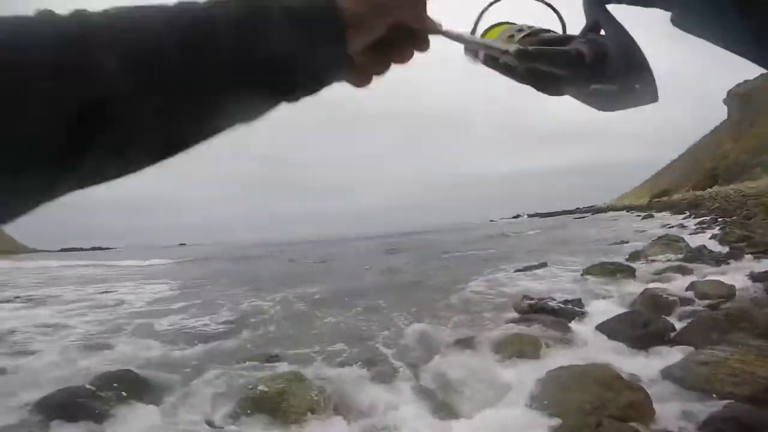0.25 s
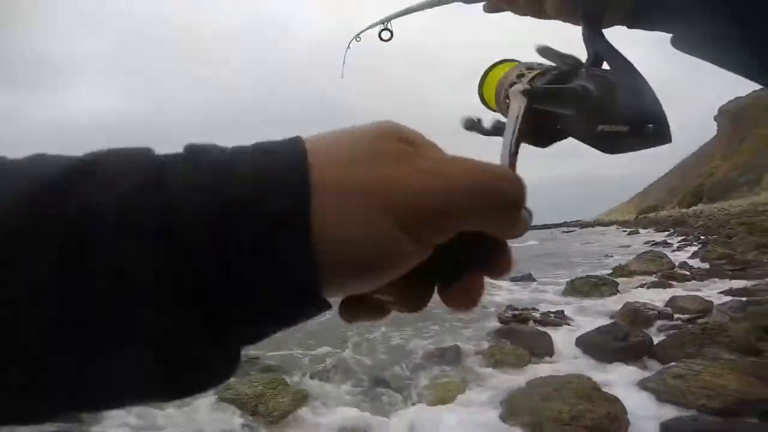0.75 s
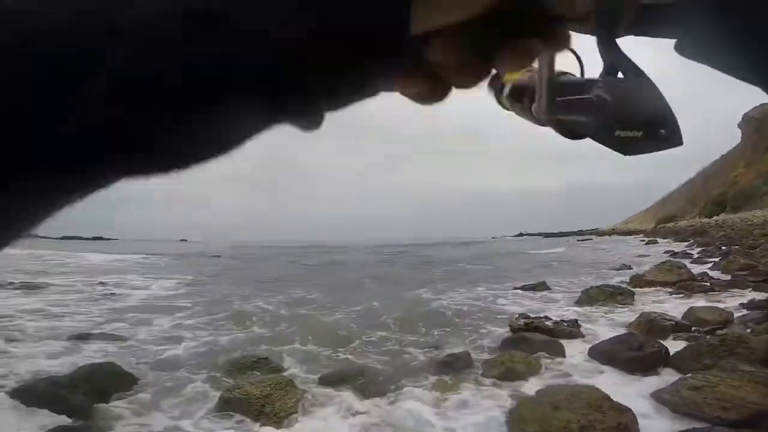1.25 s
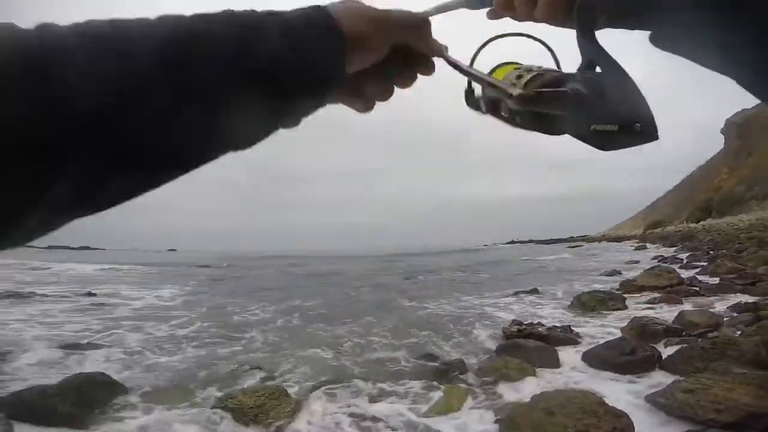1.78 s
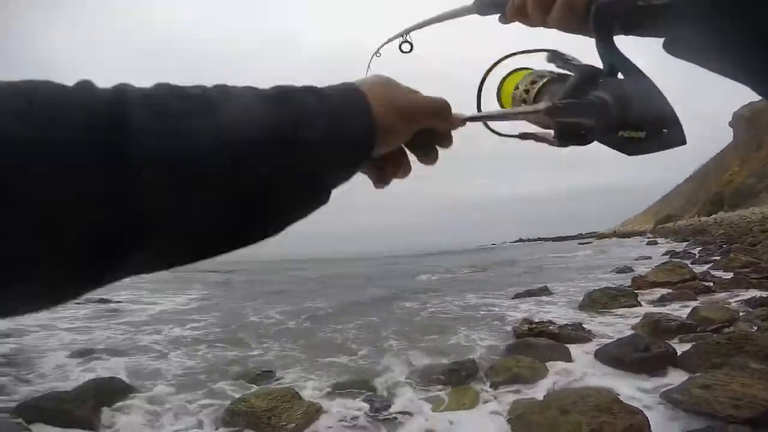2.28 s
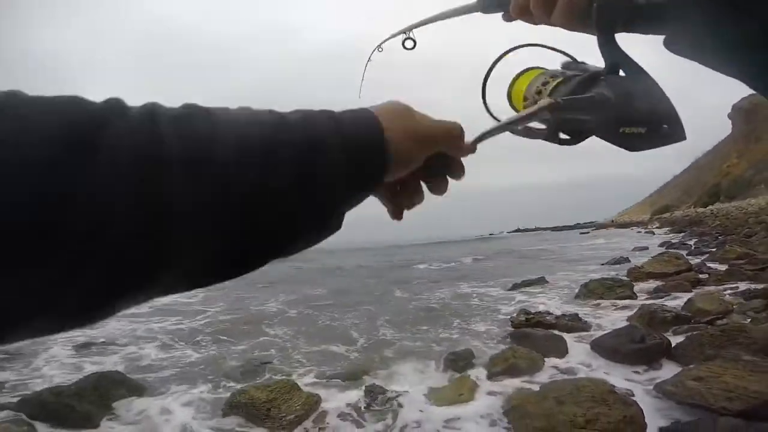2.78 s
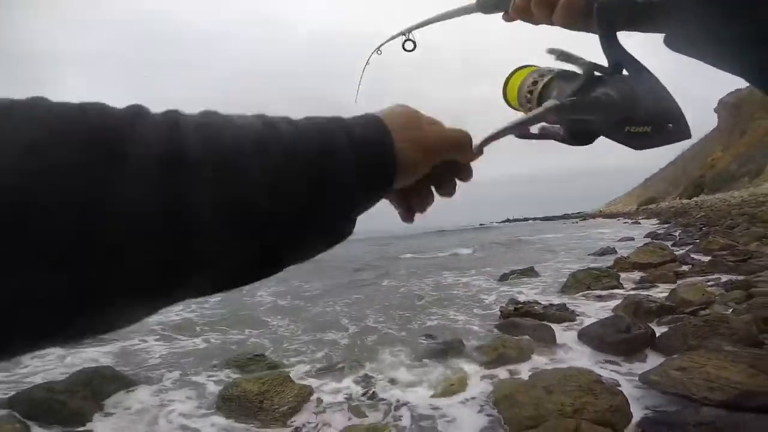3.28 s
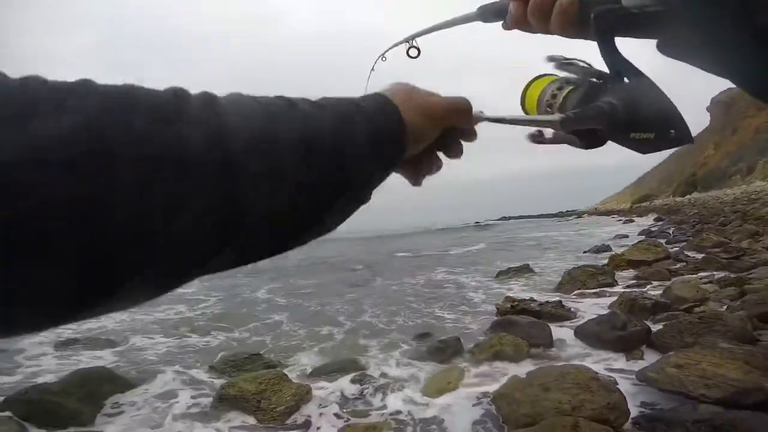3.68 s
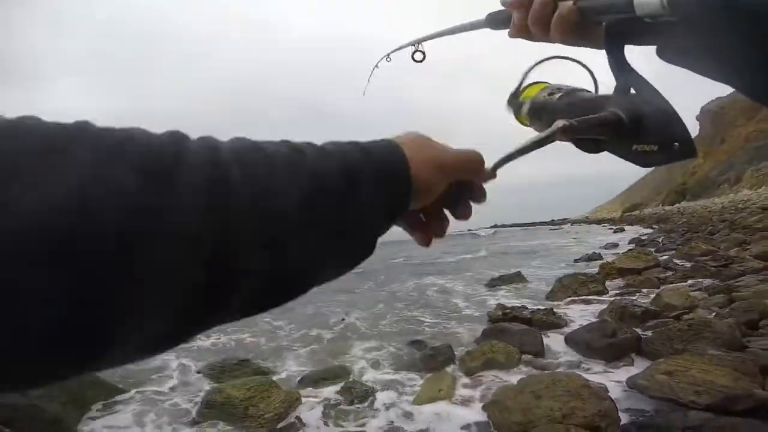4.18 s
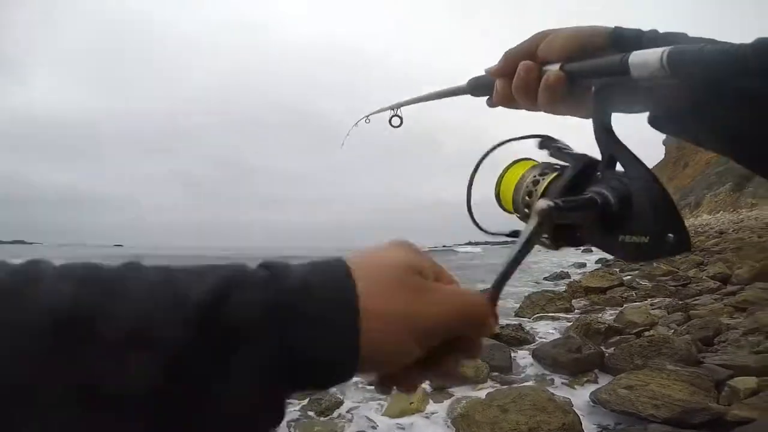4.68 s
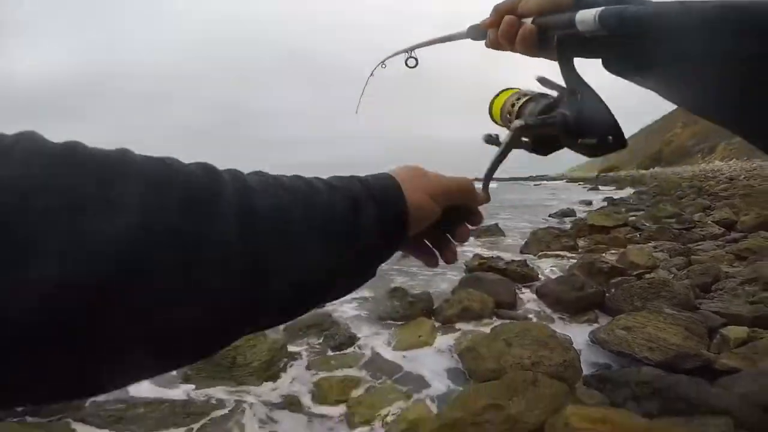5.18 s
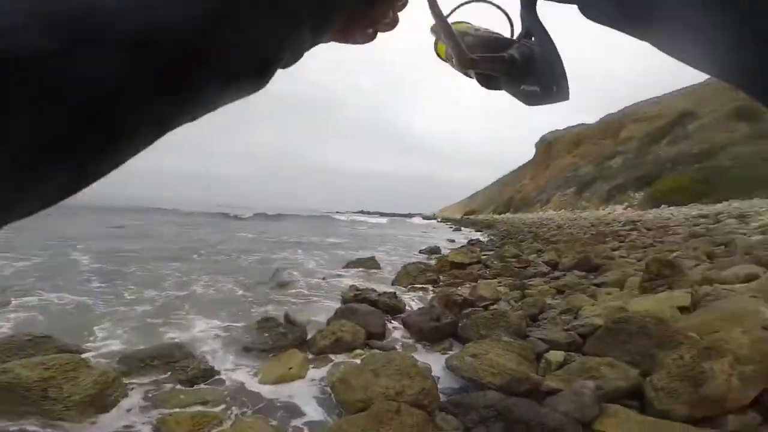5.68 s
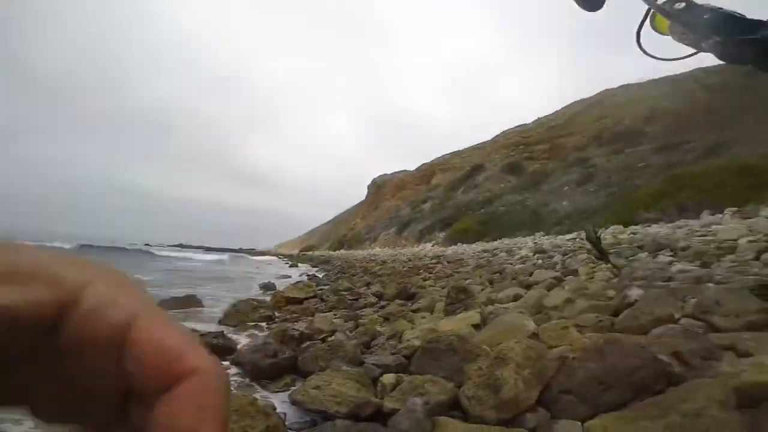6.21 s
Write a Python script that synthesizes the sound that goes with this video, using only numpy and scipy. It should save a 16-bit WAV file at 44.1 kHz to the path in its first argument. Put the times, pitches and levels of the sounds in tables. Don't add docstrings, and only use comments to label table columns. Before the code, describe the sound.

Heard from inside a closed camera housing at a rocky shore: a bright wave hisses and splashes away during the first second, leaving a quieter steady surf. Low wind buffets press on the case. Turning a fishing reel sends irregular dull thumps through the mount, with faint gear whirr and tiny line ticks. At the end the surf swells again and a hand strikes and rubs the housing very loudly.

```python
import sys
import numpy as np
from scipy import signal
from scipy.fft import rfft, irfft
from scipy.io import wavfile
from scipy.ndimage import uniform_filter1d

SR = 44100
rng = np.random.default_rng(int(sys.argv[2]) if len(sys.argv) > 2 else 0)


def output_pcm(signal):
    pcm = np.clip(np.atleast_2d(signal).T, -1, 1) * 32767
    wavfile.write(sys.argv[1], SR, np.round(pcm).astype(np.int16))


def how_loud(loudness_db):
    steps = np.asarray(loudness_db, float) / 20
    return 10 ** steps


N = 284437


def evened(x):
    return x / np.sqrt(np.mean(x ** 2) + 1e-20)


def read(points, hz):
    f, value = np.transpose(points)
    return np.interp(np.log(hz + 1), np.log(f + 1), value)


def curves(rows, t):
    s, *columns = np.transpose(rows)
    return [np.interp(t, s, c) for c in columns]


def add(mix, s, sound):
    part = mix[round(s * SR):][:len(sound)]
    part += sound[:len(part)]


def shaped(gain_of_hz):
    hz = np.fft.rfftfreq(N, 1 / SR)
    return evened(irfft(rfft(rng.standard_normal(N)) * gain_of_hz(hz), N))


def coloured(points):
    return shaped(lambda hz: how_loud(read(points, hz)))


def wander(ms):
    span = max(int(ms * SR / 1000), 1)
    return evened(uniform_filter1d(uniform_filter1d(rng.standard_normal(N), span), span))


def steadied(x, ms):
    envelope = uniform_filter1d(abs(signal.hilbert(x)), int(ms * SR / 1000))
    return evened(x / (envelope + 0.36))


def bells(rows, base_db):
    t = np.arange(0, N, 64) / SR
    power = sum(how_loud(db) ** 2 * np.exp(-(2 * (t - s) / length) ** 2) for s, db, length in rows)
    return 10 * np.log10(how_loud(base_db) ** 2 + np.interp(np.arange(N) / SR, t, power))


# (centre [Hz], width [Hz], level [dB])
HOUSING_MODES = [(1274, 190, 6.5), (1756, 47, -5), (2200, 194, 4), (2755, 120, 5), (3140, 100, 5.5),
                 (3554, 190, 6), (3960, 97, 6), (4580, 79, -1), (5060, 830, 7), (6100, 180, -2),
                 (6250, 310, 5.5), (7500, 2700, 6.5), (8600, 1200, -5), (12030, 420, -6.5)]


def housing_db(hz):
    return sum(db / (1 + (2 * (hz - f) / width) ** 2) for f, width, db in HOUSING_MODES)


# (time [s], level [dB])
DRAINING = [(0.0, -32), (0.07, -33.5), (0.23, -35), (.45, -37.5), (0.6, -39), (0.78, -40.5), (0.96, -45.5),
            (1.43, -50), (2.87, -49), (3.4, -50.5), (6.45, -50)]


def tide(t):
    drain_db = curves(DRAINING, t)[0]
    from_db, full_db = -53, -36
    near = np.clip((drain_db - from_db) / (full_db - from_db), 0, 1)
    body_db = drain_db + 1.27 * np.maximum(t - 2.92, 0)
    fizz_db = drain_db - 8.5 + 1.3 * near ** 3 - 0.64 * np.sin(np.pi * near)
    surge_s, rise_s = 6.23, 0.29
    surge = np.exp(-(np.maximum(surge_s - t, 0) / rise_s) ** 2)
    rumble_db = 0.3 * near + 3 * surge
    splash_db = 6.5 * surge
    return body_db, fizz_db, rumble_db, splash_db, near


# (frequency [Hz], level [dB per Hz])
NEAR_TONE = [(88, -45), (150, -5.5), (234, -10), (409, -5), (803, -7), (1250, -12), (1600, -9),
             (2400, -5.5), (3500, -12), (4200, -16), (7370, -17), (8600, -18.5), (15000, -26.5)]
# (frequency [Hz], level [dB per Hz])
FAR_TONE = [(90, -31), (150, -6), (250, -5.5), (600, -5), (1050, -10), (1280, -3), (1550, -6.5),
            (2500, -8.5), (4200, -16.5), (5500, -18.5), (7500, -21), (9000, -21), (15000, -26.5)]


def surf(patchy_db=1.25, flicker_db=0.14):
    hop, window = 128, 512
    frames = N // hop + 5
    hz = np.fft.rfftfreq(window, 1 / SR)[:, None]
    a, b, patches = rng.standard_normal((frames, len(hz), 3)).T
    patches = evened(uniform_filter1d(uniform_filter1d(patches, 6, 0), 14, 1))
    flicker = evened(uniform_filter1d(rng.standard_normal(frames), 7))
    body_db, fizz_db, rumble_db, splash_db, near = tide(np.arange(frames) * hop / SR)

    shape = how_loud((1 - near) * read(FAR_TONE, hz) + near * read(NEAR_TONE, hz))
    shape *= how_loud(rumble_db * np.clip(np.log2(1300 / (hz + 1)), 0, 1))
    shape *= how_loud(splash_db * np.exp(-(np.log2((hz + 1) / 2000) / 0.3) ** 2))
    heard = shape * how_loud(housing_db(hz))
    body_sum = np.sqrt(((heard * ((hz > 300) & (hz < 4000))) ** 2).sum(0))
    fizz_sum = np.sqrt(((heard * (hz >= 4000)) ** 2).sum(0))
    high = np.clip(np.log2((hz + 1) / 3000), 0, 1)
    shape *= (how_loud(body_db) / body_sum) ** (1 - high) * (how_loud(fizz_db) / fizz_sum) ** high

    chance = how_loud(patchy_db * patches + flicker_db * flicker * (0.3 + high))
    foam = (a + 1j * b) * shape * chance
    outside = signal.istft(foam, nperseg=window, noverlap=window - hop)[1][:N]
    return irfft(rfft(outside) * how_loud(housing_db(np.fft.rfftfreq(N, 1 / SR))), N)


def bubbles(under_surf_db=-10.5, per_s=900, spread_db=2.6):
    size = how_loud(spread_db * np.minimum(rng.exponential(1, N), 5))
    pops = size * (rng.random(N) < per_s / SR)
    kind = rng.integers(0, 24, N)
    out = np.zeros(N)
    for k, hz in enumerate(np.geomspace(900, 9000, 24)):
        u = np.linspace(0, 1, int(5 * SR / hz))
        grain = np.sin(2 * np.pi * 5 * (u + 0.11 * u ** 2)) * np.sin(np.pi * u ** 1.43) ** 2
        level = how_loud(read(NEAR_TONE, hz) + housing_db(hz))
        out += level * signal.oaconvolve(pops * (kind == k), grain)[:N]
    body_db = tide(np.arange(N) / SR)[0]
    return how_loud(under_surf_db + body_db) * evened(out)


# (time [s], peak level [dB], pitch [Hz], direction [+-1], rebound [share])
MOUNT_JOLTS = [(0.3998, -12, 79.5, -1, 0.54), (.813, -21, 79, 1, 0.11), (0.836, -22.5, 34.7, 1, -0.11),
               (0.961, -33, 70, 1, 0.18), (1.972, -22.5, 73.4, -1, 0.44), (2.402, -32, 89, 1, -0.23),
               (2.841, -24, 72, -1, 0.017), (3.333, -22.5, 83, -1, 0.28), (3.774, -16.5, 82, -1, 0.41),
               (4.601, -36, 83, -1, .2), (1.181, -38, 90, 1, 0.0035), (3.504, -36, 99, 1, 0.72),
               (4.78, -39.5, 137, 1, 0.06), (5.211, -42, 132, 1, 0.36), (5.959, -46, 108, 1, -0.039),
               (6.05, -40, 131, -1, 0.32), (5.01, -31, 154, -1, 0.56), (5.352, -16, 81, 1, 0.16),
               (6.377, 1.6, 59, -1, 0.025), (6.388, -11, 58.4, 1, .05), (6.37, -18, 75, -1, -0.062),
               (6.403, -17, 80, -1, -1), (6.427, -18.5, 187, 1, -1.1), (6.453, -5, 43, -1, -0.14)]


def jolts(sharp=1.73, narrow=1.71, sag=0.59):
    out, t = np.zeros(N), np.arange(N) / SR
    for s, db, hz, way, share in MOUNT_JOLTS:
        near = slice(round((s - .05) * SR), round((s + .07) * SR))
        turn = hz * (t[near] - s)
        phase = turn / (1 + sag * np.maximum(turn, 0))
        steepness = np.where(turn < 0, sharp, narrow)
        swing = np.cos(2 * np.pi * phase) * np.exp(-(steepness * turn) ** 4 / (1 + turn ** 2))
        rebound_turn = 0.94 + 0.25 * share
        rebound = share * np.exp(-(3 * (turn - rebound_turn)) ** 2)
        out[near] += how_loud(db) * np.sign(way) * (swing - rebound)
    return out


# (time [s], peak level [dB])
BLOWS = [
    (1.048, -42.5),
    (1.966, -52.5),
    (6.364, -18.5),
    (6.373, -27),
    (6.4364, -16),
]
# (frequency [Hz], level [dB], t60 [s])
SHELL_MODES = [
    [(342, 5, 0.037), (433, -4, 0.031), (224, 6, 0.032)],
    [(727, 8, 0.056)],
    [(592, 3.5, 0.037), (1110, -5, 0.03), (2000, 3.5, 0.0085), (4200, -21, .02), (5500, -27, .015)],
    [(1260, 3.5, 0.036), (3200, -14, 0.1), (4000, -10, 0.075), (4310, -11, 0.066), (5400, -15, 0.065)],
    [(1400, 7.5, 0.011), (2050, -3.5, 0.021), (900, 2, 0.0066), (3660, -24, 0.047), (5530, -26, .015)],
]


def knocks():
    out, t = np.zeros(N), np.arange(4000) / SR
    for (s, db), modes in zip(BLOWS, SHELL_MODES):
        ring = sum(how_loud(d - 60 * t / t60) * np.sin(2 * np.pi * hz * t) for hz, d, t60 in modes)
        add(out, s, how_loud(db) * ring * (1 - np.exp(-t / 0.0004)))
    return out


# (time [s], level [dB])
RUBBING = [
    (6.366, -29),
    (6.385, -30.5),
    (6.4, -37.5),
    (6.412, -36),
    (6.42, -37.5),
    (6.433, -32.5),
    (6.45, -38),
]
# (frequency [Hz], level [dB per Hz])
SKIN_TONE = [(100, -28), (200, 3), (450, -16), (700, -5), (1200, -6.5), (1500, -19), (1950, -2),
             (2500, -17), (3100, -11), (3500, -27), (4100, -21), (6000, -34), (15000, -52)]


def rub():
    t = np.arange(N) / SR
    touch = np.clip((t - RUBBING[0][0]) / 0.0047, 0, 1)
    grip_db = 2 * wander(2.5)
    return touch * how_loud(curves(RUBBING, t)[0] + grip_db) * coloured(SKIN_TONE)


# (time [s], peak level [dB], centre [Hz], width [Hz])
SMALL_SPLASHES = [
    (.18, -31, 2880, 1500),
    (.281, -26, 1850, 500),
    (.282, -34, 2900, 1300),
    (.377, -30, 2280, 900),
    (.391, -38, 6500, 3000),
    (.445, -39, 5500, 4000),
    (.463, -37, 4220, 3000),
    (.537, -55, 8000, 2500),
    (.762, -32.5, 2050, 700),
    (.845, -47, 6500, 3000),
]
# (time [s], peak level [dB], centre [Hz], width [Hz])
LINE_TICKS = [(1.059, -53, 7500, 1500), (1.495, -44.5, 5300, 1500), (1.678, -45, 7600, 1000),
              (1.679, -44, 2500, 1200), (1.835, -47, 3700, 2000), (2.212, -54, 8000, 5000),
              (2.239, -45, 5300, 1500), (2.24, -56, 10000, 6000), (2.549, -47, 5200, 1200),
              (2.614, -44, 5000, 1200), (2.614, -50, 7500, 1500), (2.636, -55, 10000, 6000),
              (2.67, -47, 7500, 1000), (2.905, -53, 6200, 800), (3.294, -51, 5500, 1800),
              (3.295, -57, 11000, 5000), (3.338, -60, 11500, 4000), (3.42, -60, 11500, 3000),
              (3.663, -59, 11500, 6000), (3.83, -59, 10500, 4000), (4.02, -48.5, 5200, 3000),
              (4.487, -58, 11000, 3000), (4.62, -42, 3800, 2000), (4.625, -51, 7500, 1200),
              (5.065, -46, 4200, 2500), (5.129, -49, 5000, 4000), (5.308, -46, 5950, 300),
              (5.367, -46, 5200, 2000)]


def ticks():
    out, t = np.zeros(N), np.arange(600) / SR
    rise_s = .0017
    for s, db, hz, width in SMALL_SPLASHES + LINE_TICKS:
        a, b = rng.standard_normal((2, 600))
        smear = np.exp(-np.pi * width / SR)
        slow = signal.lfilter([1], [1, -2 * smear, smear ** 2], a + 1j * b)
        puff = evened((slow * np.exp(2j * np.pi * hz * t)).real)
        add(out, s - .001, how_loud(db - 2.5) * puff * (t / rise_s) * np.exp(1 - t / rise_s))
    return out


# (frequency [Hz], level [dB per Hz])
BUFFET_TONE = [(3, -1), (10, -3.5), (16, 1), (26, -3), (38, -12.5), (55, -43), (250, -110)]
# (frequency [Hz], level [dB per Hz])
FLUTTER_TONE = [(20, 1.5), (45, 2.5), (65, 1), (95, -1.5), (120, -11), (180, -27), (300, -30), (1500, -100)]
# (time [s], peak level [dB], length [s])
PORT_GUSTS = [(.12, -41, 0.09), (.33, -27, 0.081), (.56, -34.5, 0.21), (.73, -30, 0.13), (.85, -41, 0.035),
              (.97, -27.5, 0.18), (1.3, -29.5, 0.19), (1.5, -32, 0.12), (1.72, -39, 0.12),
              (1.84, -33, 0.17), (2.19, -31.5, 0.097), (2.38, -31, 0.083), (2.62, -37.5, 0.079),
              (2.76, -38, 0.19), (2.94, -47, 0.051), (3.11, -36.5, 0.073), (3.33, -28, 0.052),
              (3.45, -32.5, .07), (3.56, -36, 0.11), (3.78, -41, .12), (3.93, -36.5, 0.2),
              (4.35, -35.5, 0.09), (4.47, -35, 0.058), (4.63, -41.5, 0.21), (4.97, -47, 0.076),
              (5.18, -38, 0.046), (5.33, -34.5, 0.18), (5.57, -36.5, 0.037), (6.33, -39.5, 0.098)]
# (time [s], peak level [dB], length [s])
FLUTTER_FLURRIES = [(0, -39, 0.13), (0.722, -40, 0.083), (1.17, -53, .06), (1.692, -48.5, 0.19),
                    (2.046, -45, .08), (2.956, -45, 0.13), (3.256, -48, 0.079), (4.198, -44.5, 0.072),
                    (4.353, -46.5, 0.11), (4.65, -46, 0.14), (4.797, -43, .08), (5.14, -44, 0.094),
                    (5.266, -46, .1), (5.423, -40.5, 0.063), (5.797, -49.5, 0.11), (6.1, -44, 0.28),
                    (6.304, -42, 0.076)]


def wind(gusty_db=1.5, lumpy_db=2.5):
    t = np.arange(N) / SR
    lull_db = -42
    buffet_db = bells(PORT_GUSTS, lull_db - 0.43 * t)
    calm_db = -54 + 0.18 * (buffet_db - lull_db) + lumpy_db * wander(25)
    shudders = [(s, min(db - 19, -42), 0.078) for s, db, *_ in MOUNT_JOLTS if s < 6.3]
    flutter_db = bells(shudders + FLUTTER_FLURRIES, calm_db)
    lumps = steadied(coloured(BUFFET_TONE), 50)
    flutter = evened(steadied(coloured(FLUTTER_TONE), 31) * how_loud(gusty_db * wander(6.1)))
    return how_loud(buffet_db) * lumps + how_loud(flutter_db) * flutter


# (centre [Hz], width [Hz], level [dB])
GEAR_BANDS = [(2752, 270, 4.5), (2310, 170, -7.5), (4880, 430, -9), (6000, 280, -10), (7500, 1400, -17.5)]
# (time [s], peak level [dB], length [s])
HANDLE_PULLS = [(1.07, -60, 0.035), (1.3, -62.5, .3), (1.68, -64, .06), (1.95, -62, 0.39),
                (2.27, -54.5, 0.17), (2.62, -55, 0.15), (2.82, -54.5, 0.21), (2.91, -50, .07),
                (3.13, -59, 0.15), (4.07, -59.5, 0.18), (4.47, -55, 0.26), (4.62, -48.5, 0.034),
                (5.09, -52.5, 0.067), (5.3, -68, 0.2), (6.04, -56.5, 0.18)]


def reel(idle_db=-64.5, rough_db=1.5, uneven_db=1.75):
    def teeth(hz):
        return sum(how_loud(db) / (1 + (2 * (hz - f) / width) ** 2) for f, width, db in GEAR_BANDS)

    level_db = bells(HANDLE_PULLS, idle_db)
    return how_loud(level_db + rough_db * wander(5.4) + uneven_db * wander(8.9)) * shaped(teeth)


def scene():
    water = surf() + bubbles()
    handling = jolts() + knocks() + rub()
    return (water + handling + ticks() + wind() + reel())[None]


def band_limit(x):
    return signal.sosfilt(signal.butter(12, 15200, fs=SR, output="sos"), x)


def record(dry):
    rounded = 1.15 * np.tanh(dry / 1.15)
    going_on = np.pad(rounded, [(0, 0), (255, 255)], "edge")
    low_pass = signal.firwin(511, 15250, window=("kaiser", 9), fs=SR)
    limited = signal.oaconvolve(going_on, low_pass[None], "valid", axes=1)
    return band_limit(limited)


dry = scene()
out = record(dry)
output_pcm(out)
```